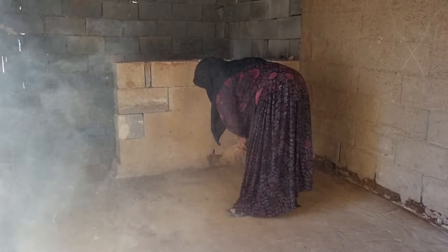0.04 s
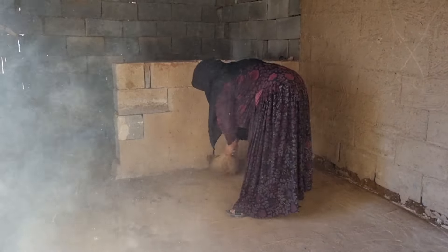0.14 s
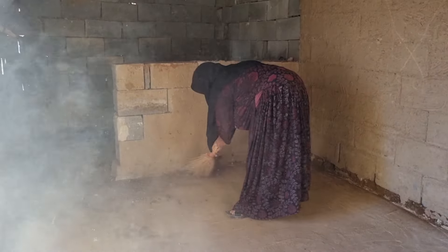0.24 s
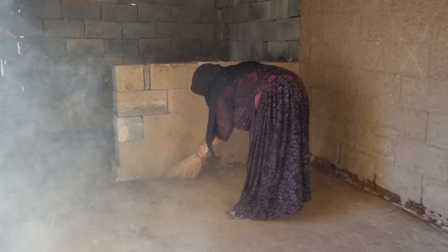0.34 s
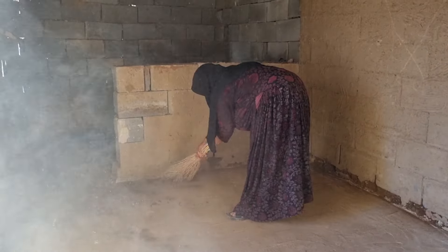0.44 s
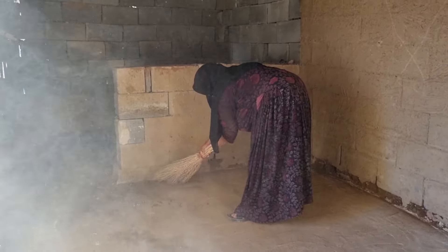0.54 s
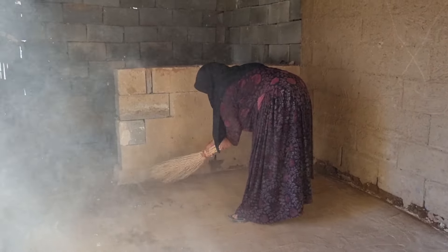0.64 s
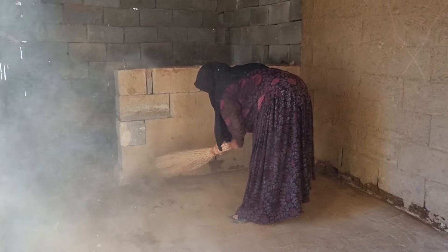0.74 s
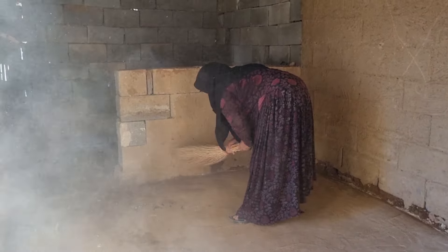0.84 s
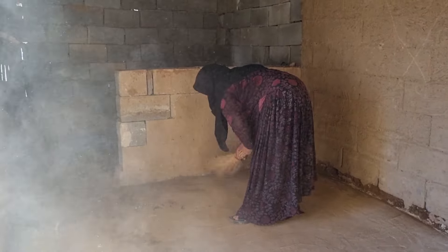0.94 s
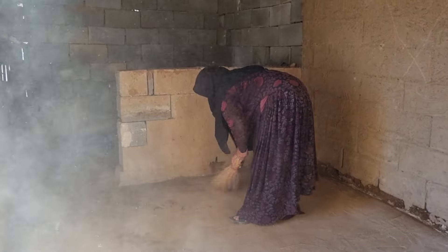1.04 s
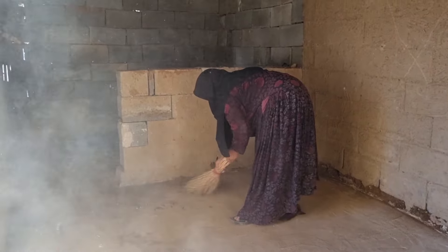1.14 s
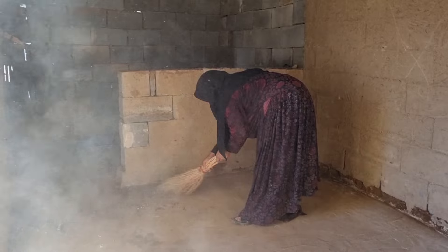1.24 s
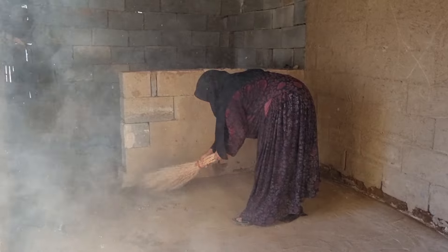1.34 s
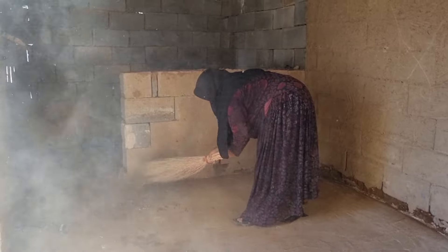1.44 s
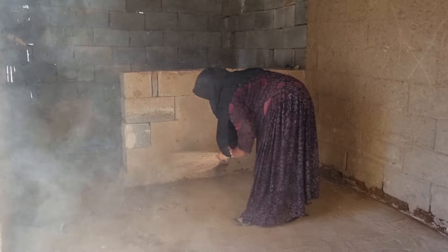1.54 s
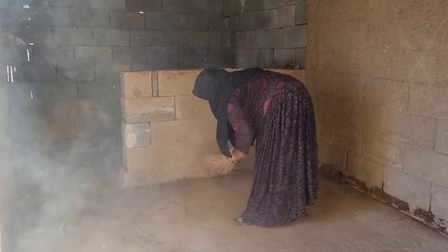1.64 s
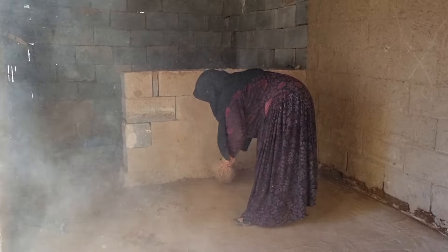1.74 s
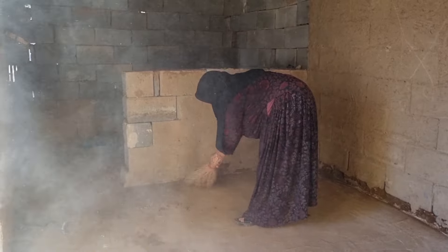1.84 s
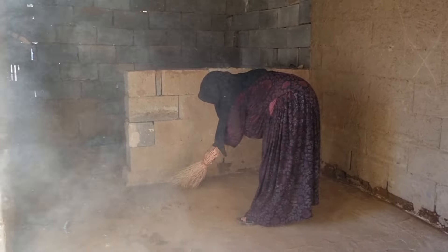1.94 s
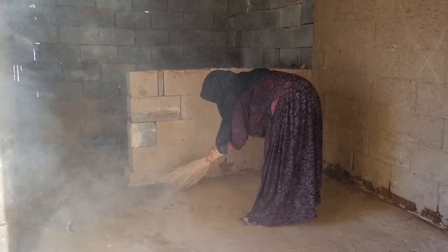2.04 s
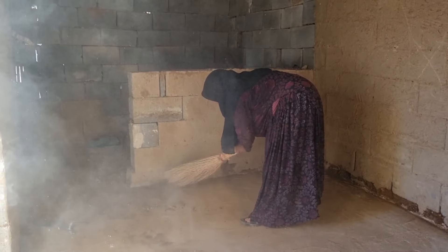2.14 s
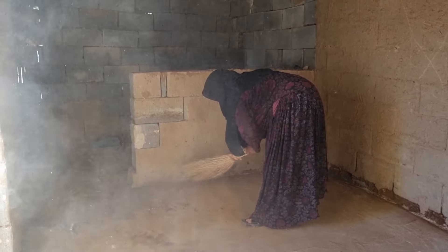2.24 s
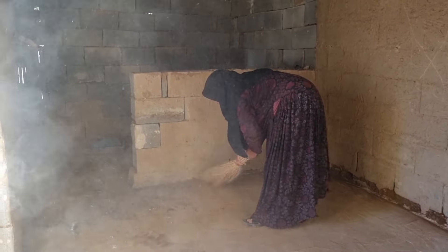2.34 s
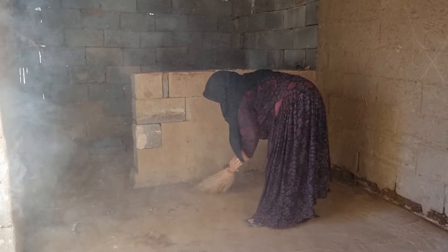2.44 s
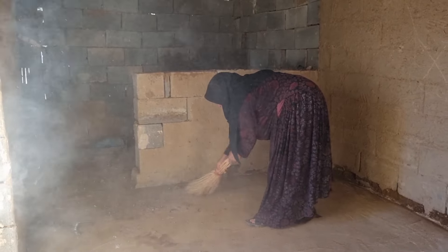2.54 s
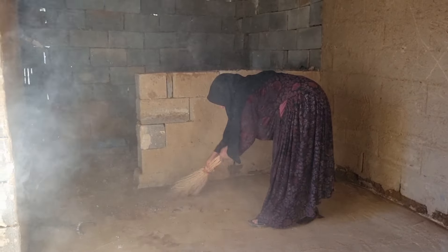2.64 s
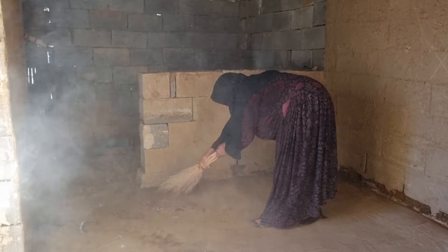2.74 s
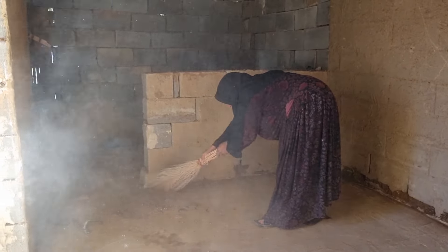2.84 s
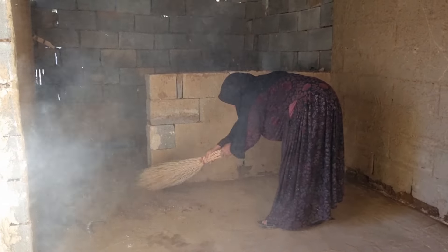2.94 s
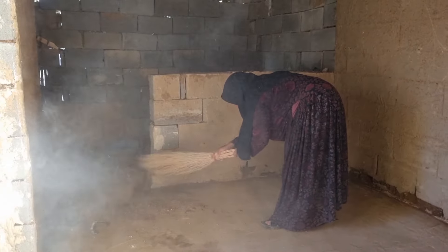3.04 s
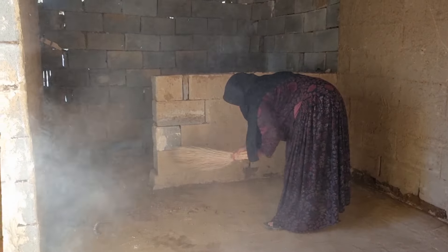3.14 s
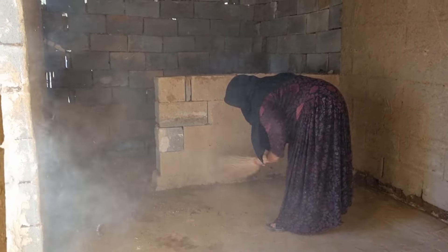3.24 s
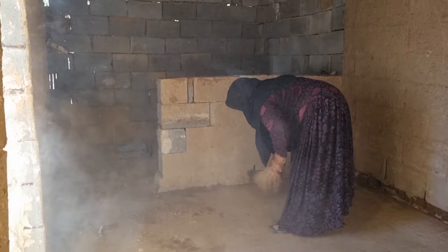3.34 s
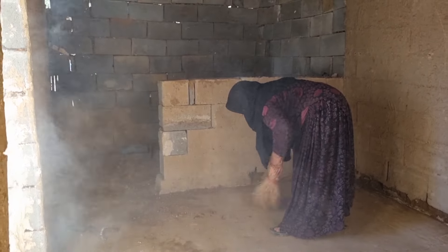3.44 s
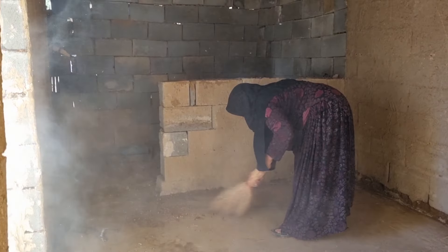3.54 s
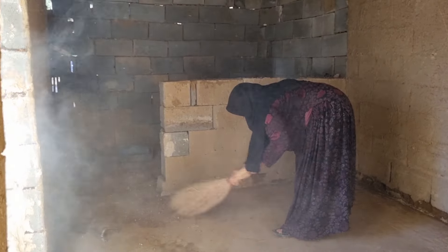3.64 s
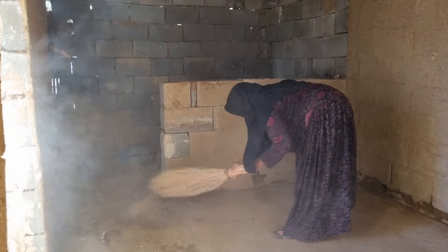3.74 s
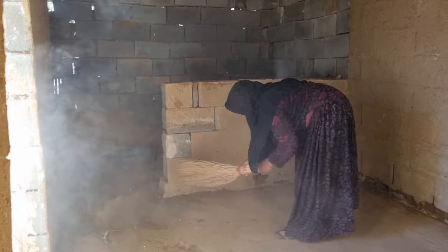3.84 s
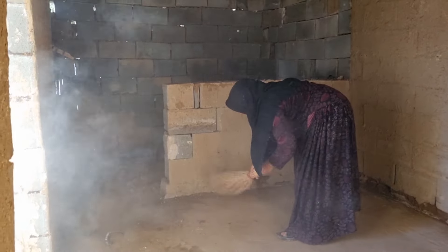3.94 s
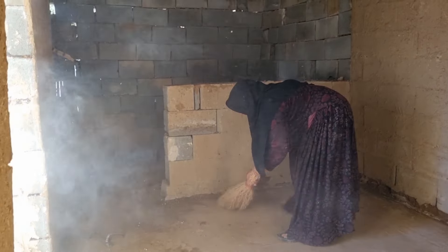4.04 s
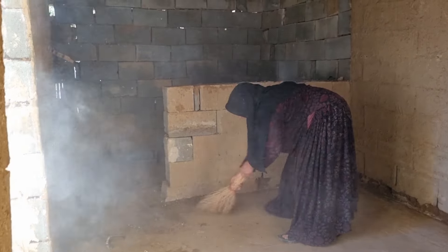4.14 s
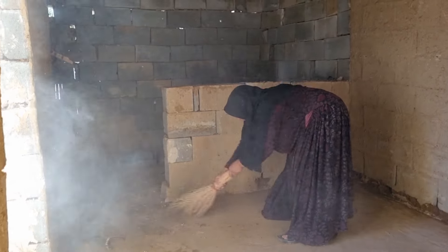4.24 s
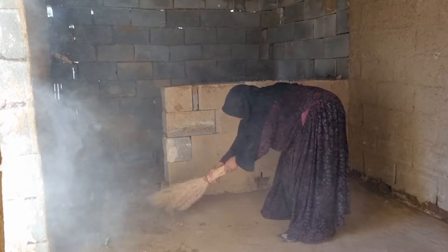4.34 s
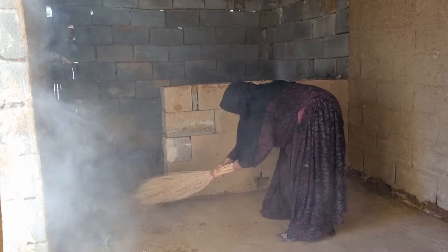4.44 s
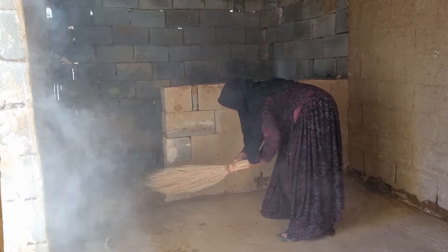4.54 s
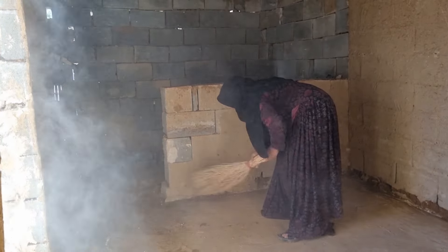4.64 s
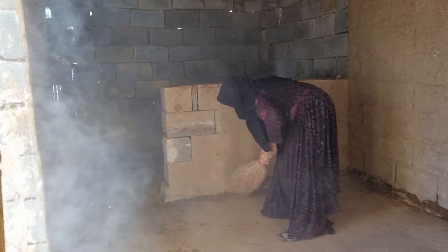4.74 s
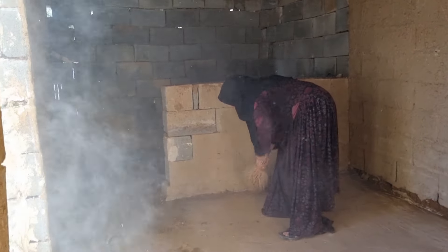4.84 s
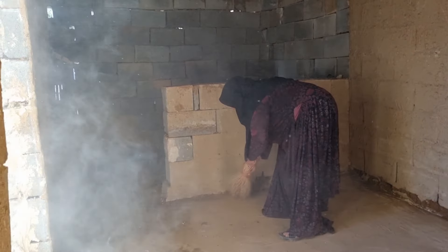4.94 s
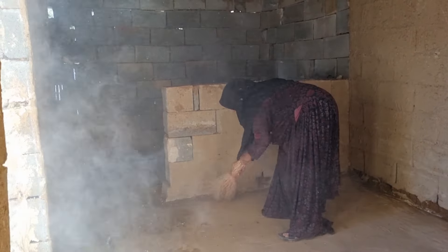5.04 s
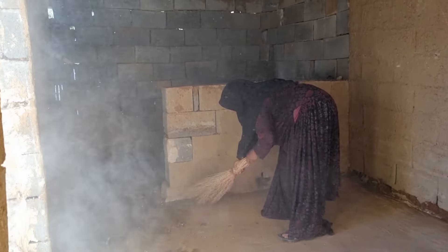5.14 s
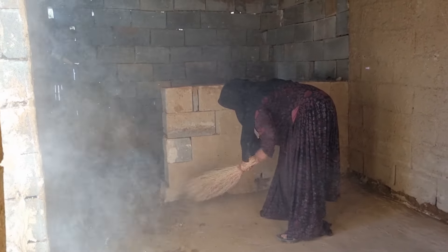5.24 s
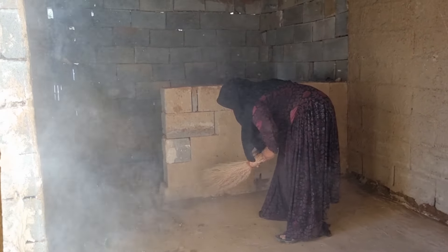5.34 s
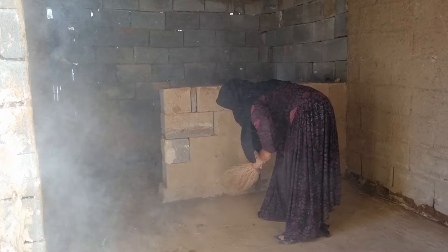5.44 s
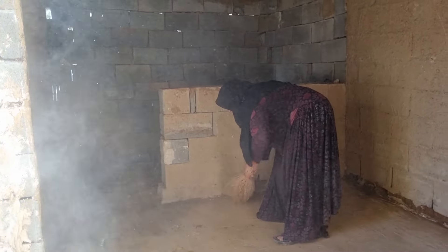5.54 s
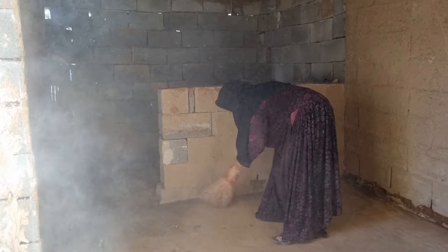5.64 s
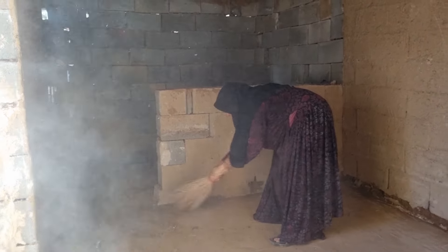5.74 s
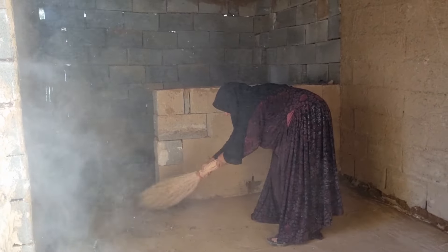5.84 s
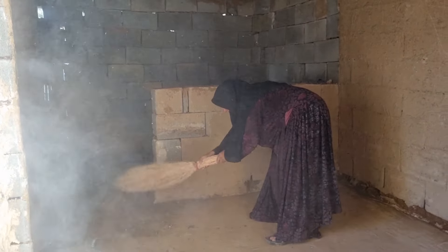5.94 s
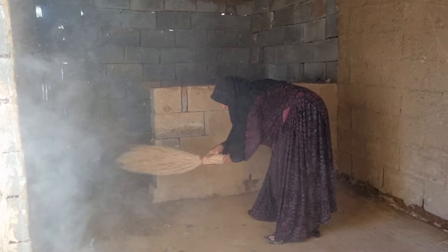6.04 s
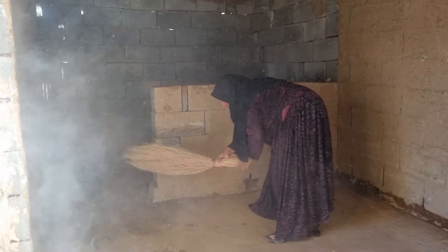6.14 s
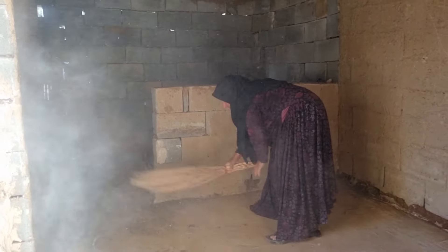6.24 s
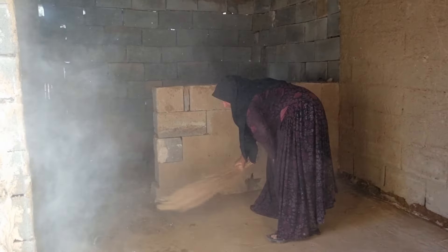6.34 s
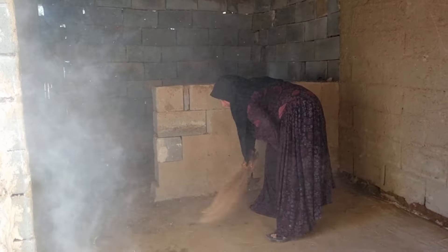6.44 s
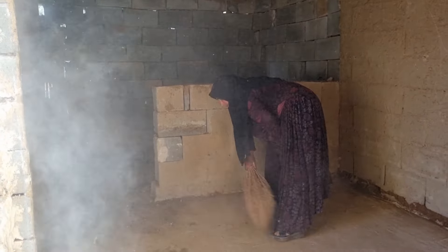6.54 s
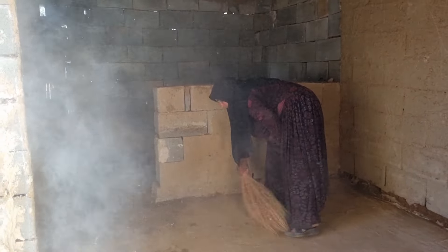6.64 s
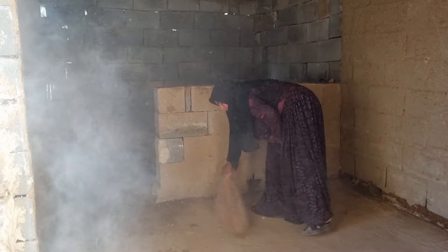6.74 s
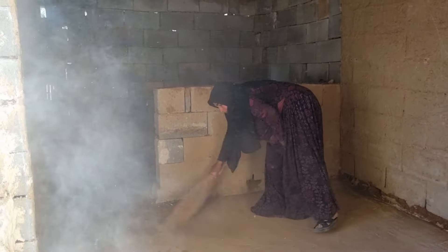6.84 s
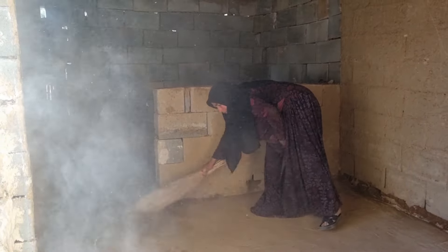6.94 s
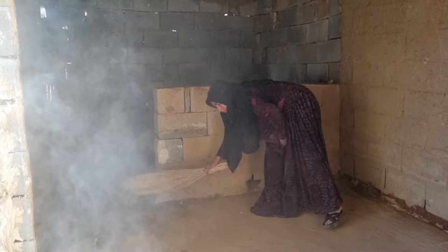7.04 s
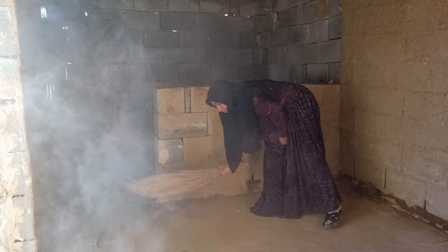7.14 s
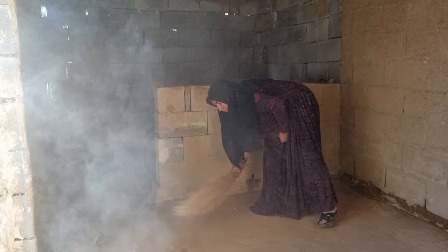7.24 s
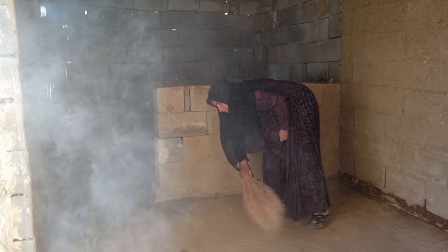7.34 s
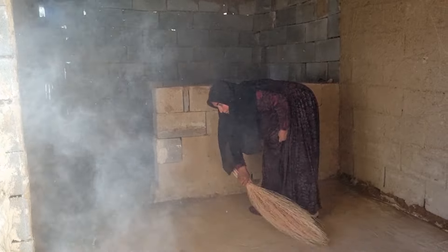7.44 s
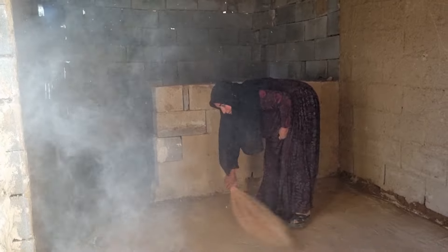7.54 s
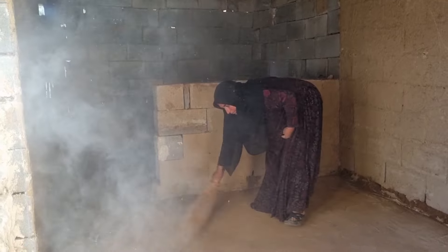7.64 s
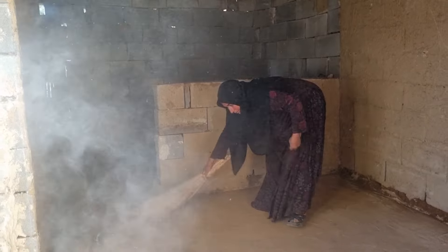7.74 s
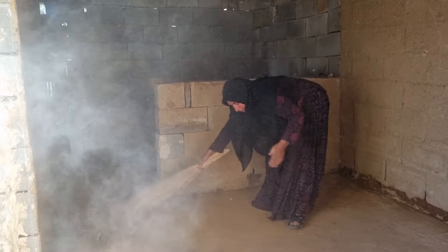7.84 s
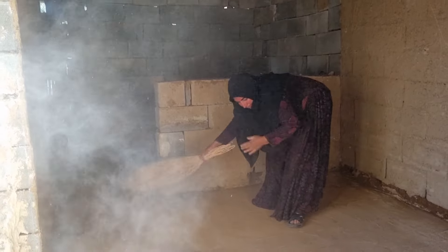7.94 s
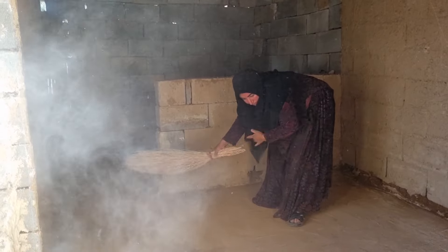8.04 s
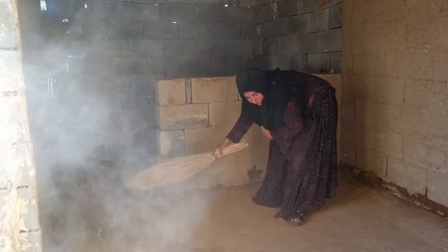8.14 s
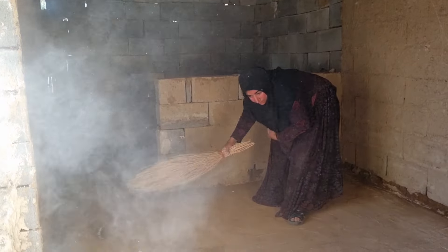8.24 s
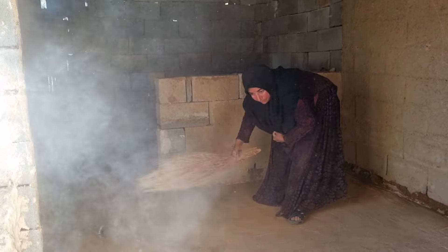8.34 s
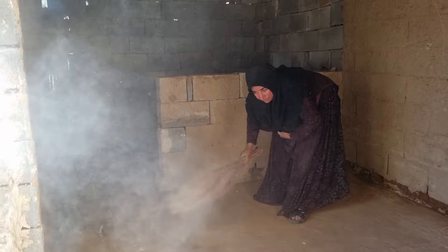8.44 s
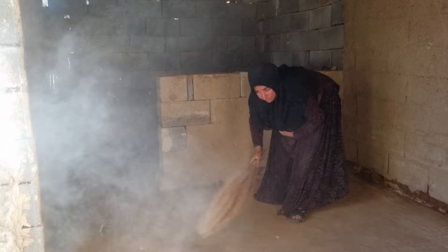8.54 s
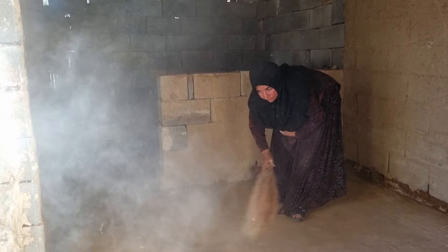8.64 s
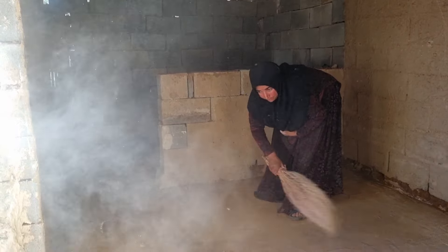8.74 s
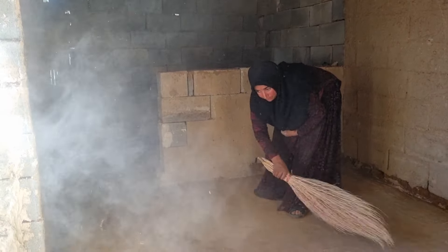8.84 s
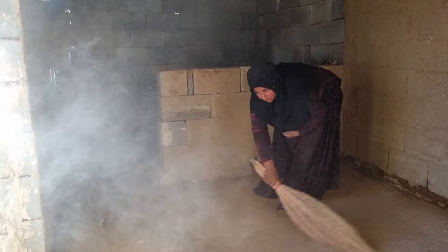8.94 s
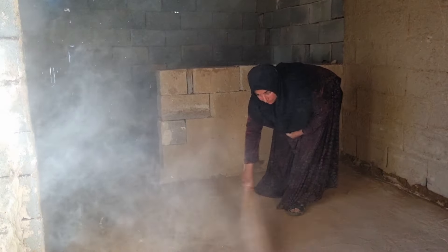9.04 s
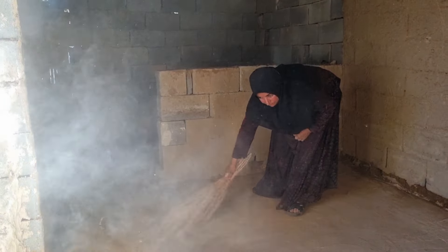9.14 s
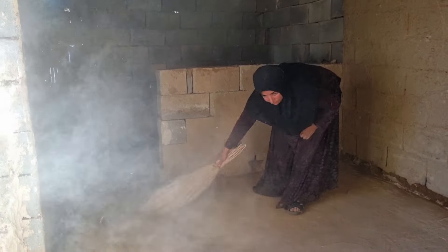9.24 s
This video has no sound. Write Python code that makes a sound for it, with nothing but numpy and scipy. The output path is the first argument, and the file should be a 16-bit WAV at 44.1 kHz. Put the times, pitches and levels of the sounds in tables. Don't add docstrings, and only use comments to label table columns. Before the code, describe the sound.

Dry swishes of a straw broom on dusty concrete, broken by snaps, gritty clicks and soft hollow thuds, over a very faint outdoor rumble.

```python
import sys
import numpy as np
from scipy import signal
from scipy.fft import rfft, irfft, next_fast_len
from scipy.io import wavfile

SR = 44100
rng = np.random.default_rng(int(sys.argv[2]) if len(sys.argv) > 2 else 0)


def dump_mix(stems):
    frames = np.atleast_2d(stems).T
    limited = np.clip(frames, -1, 1)
    pcm = np.round(limited * 32767).astype(np.int16)
    wavfile.write(sys.argv[1], SR, pcm)


def elevation(decibels):
    levels = np.asarray(decibels, float)
    return 10 ** (levels / 20)


N = 409235

# time in seconds, level in dB.
RUMBLE = [(0.0, -62.5), (1.14, -63.5), (1.29, -63.5), (1.89, -59.5), (2.35, -65), (3.07, -59.5),
          (3.64, -60), (4.29, -57), (4.91, -64.5), (5.81, -59), (6.23, -65), (6.93, -57), (7.21, -69),
          (7.65, -53), (7.91, -64.5), (9.28, -63.5)]
# frequency in Hz, level in dB per Hz.
AIR_COLOUR = [(13, -38), (22, -3), (43, -8), (76, -9), (97, -10.5), (177, -20.5), (280, -19), (520, -28),
              (947, -33.5), (1600, -42), (1830, -44.5), (2690, -32), (3260, -31.5), (7230, -23),
              (9780, -40), (15600, -27.5)]
# time in seconds, pitch in Hz, level in dB.
CROW = [
    (1.36, 985, -81),
    (1.45, 975, -80),
    (1.53, 955, -82),
    (1.6, 933, -76),
    (1.78, 922, -77),
    (1.95, 915, -81),
    (2.1, 907, -74),
    (2.28, 896, -75),
    (2.4, 870, -90),
]
# frequency in Hz, time to fall 60 dB in seconds.
ROOM_ECHO = [(100, 0.29), (500, 0.21), (2000, 0.17), (6000, 0.14), (14000, 0.16)]
# start in seconds, peak in dB, contact frequency in Hz.
THUDS = [(0.91, -46, 150), (1.144, -20.5, 110), (1.95, -45, 200), (3.189, -43, 150), (3.717, -38.5, 500),
         (3.735, -37, 300), (3.766, -20, 2600), (3.785, -27.5, 503), (3.797, -33.5, 607),
         (3.817, -43.5, 500), (4.025, -47.5, 400), (4.095, -30, 203), (4.12, -18.5, 90), (5.7, -39.5, 300),
         (6.735, -51, 353), (7.347, -49, 447), (7.705, -38, 300), (9.24, -37, 300)]
# frequency in Hz, level in dB, time to fall 60 dB in seconds.
LEDGE_TONES = [(97, -9.5, 0.1), (200, -17, 0.06), (253, -5.5, 0.09), (257, -16.5, 0.32), (291, -8, 0.1),
               (345, 4.5, 0.072), (340, -17, .32), (395, -9, 0.08), (572, -8, 0.06), (732, -19, 0.05),
               (1090, -9.5, 0.017), (1450, -11, 0.015), (1790, -17, .012)]
# start in seconds, peak in dB, ring in Hz, share of ring in dB.
SNAPS = [(0.1012, -30, 8000, -13), (0.9816, -25.5, 7200, -6), (1.4194, -42, 7030, -3),
         (1.6162, -41, 8220, -8), (1.7659, -26, 7300, -4), (2.3301, -38, 7450, 4), (3.454, -22, 7700, -3),
         (3.7128, -16, 5960, -9.5), (3.7185, -24, 7500, -1), (4.8726, -39, 7600, 3), (5.5, -40, 7720, -3),
         (5.9998, -29, 7660, 5.5), (6.3919, -53, 7330, -3), (6.57, -34, 7140, -7), (7.8594, -33, 7400, -4),
         (7.9124, -42, 7480, -6), (8.1294, -43, 7730, -3), (8.2094, -55, 5520, -3),
         (8.2836, -38, 7050, -3.5), (8.3694, -44, 7210, -3), (8.5028, -36, 7360, 0), (8.72, -49, 6620, -1),
         (8.832, -38.5, 7360, 1.5)]
# start in seconds, peak in dB, ring in Hz, share of ring in dB.
PEBBLES = [(0.9744, -42, 3970, -2), (1.5294, -44, 4940, -8), (1.6661, -42, 2140, -2),
           (3.1632, -39, 2780, 3), (3.3764, -35, 3240, -8), (3.892, -27, 6060, 1), (3.985, -34, 2440, -8),
           (4.0235, -28, 2410, -5), (4.29, -17.5, 7300, -5), (4.3695, -24.5, 2510, -9),
           (4.4994, -44, 2440, -3), (4.763, -34.5, 2380, -1), (4.832, -44, 4930, -4),
           (5.9754, -34, 5320, -1), (6.13, -35.5, 2600, -1), (6.1437, -36, 4300, -4),
           (7.089, -39, 3030, -10), (7.3188, -49, 2190, 0), (7.7043, -21, 2250, 0), (7.955, -38, 4660, 1),
           (8.449, -41.5, 4720, -6), (9.2397, -20, 1920, -6)]
# start in seconds, length in
# seconds, level in dB, ring in Hz, width of the ring in Hz.
SCUFFS = [(3.12, 0.3, -63, 3310, 350), (3.15, 0.32, -69, 2680, 290), (3.13, 0.14, -71, 4700, 530),
          (4.3, .2, -59, 2580, 810), (6.4, .25, -69, 4000, 1100), (1.1, .08, -71, 240, 140),
          (3.77, 0.046, -53, 650, 250), (5.76, .16, -67.5, 270, 220), (2.8, 0.121, -70, 395, 40),
          (2.5, .16, -70, 256, 86), (2.52, .14, -67, 386, 50), (3.0, .45, -70.5, 233, 180),
          (3.5, .18, -61.5, 210, 140), (6.0, .6, -76, 230, 136), (7.72, .12, -68.5, 185, 100),
          (7.95, .06, -69, 770, 700), (7.985, .07, -63, 1070, 360), (7.92, .06, -70, 2370, 400),
          (9, .07, -61.5, 4800, 1800), (8.42, 0.13, -67.5, 4600, 1400), (4.32, .06, -56, 2350, 260),
          (4.49, .06, -65, 2450, 350), (6.44, .14, -69, 2500, 500), (4.45, .3, -73, 220, 210),
          (1.62, .08, -66, 3000, 1700), (4.0, .06, -60, 2400, 500), (6.71, .23, -53.5, 274, 300),
          (7.1, 0.18, -69.5, 200, 140), (1.12, .16, -63.5, 295, 220), (4.1, .35, -60, 290, 320),
          (5.74, .12, -61, 1250, 1100), (9.12, .15, -63, 780, 400), (.12, .2, -57, 2240, 860),
          (4.3, .22, -61, 440, 660), (5.64, .16, -57.5, 600, 500), (7.28, .14, -59, 570, 610),
          (7.95, 0.28, -65.5, 5900, 1400), (2.3, .6, -72.5, 360, 15), (8.15, .5, -70, 4500, 3100)]
# start in seconds, dying time in seconds, level in dB,
# ring in Hz, width of the ring in Hz.
SCRAPES = [(3.718, .04, -46, 2900, 600), (3.865, .15, -56, 6100, 200), (3.893, .05, -50, 2420, 500),
           (4.291, 0.071, -47, 2160, 500), (4.296, 0.044, -46, 5200, 700), (4.293, .04, -50, 7300, 900),
           (4.374, .03, -54, 4500, 5000), (4.756, .05, -54, 7000, 2200), (4.83, .03, -63, 6500, 2500),
           (6.0, .06, -50, 7720, 300), (6.02, .04, -64, 5100, 300), (6.14, .1, -61, 4050, 500),
           (6.13, 0.13, -67, 1600, 300), (4.372, .04, -54, 1200, 500), (4.395, .06, -51, 3220, 500),
           (4.497, .05, -60, 2400, 500), (4.757, 0.037, -59, 2380, 400), (6.13, .03, -58, 5000, 3000),
           (6.142, 0.05, -55, 2400, 600), (6.155, 0.063, -54, 5800, 900), (6.158, 0.035, -59, 7800, 600),
           (7.7, 0.049, -49, 2300, 700), (8.0, .3, -69, 454, 300), (8.832, .04, -68, 4200, 1200),
           (9.238, .05, -49, 1900, 500), (3.79, .03, -56, 1750, 500), (3.79, .03, -58, 700, 300)]
# frequency in Hz, level in dB per Hz.
STRAW_COLOUR = [(150, -2.5), (350, -12.5), (700, -15), (1400, -9.5), (2200, -6.5), (3500, -8.5),
                (5500, -6.5), (6600, -4), (7600, 2), (8300, -4), (8900, -8.5), (10600, -7.5), (13000, -3),
                (15700, 0)]
# time in seconds, level in dB, weight on the floor in dB.
SHUFFLE = [(0, -72, -7.5), (.5, -56, 4.5), (.78, -61, -0.5), (.95, -63, 1), (1.5, -62, 2.5),
           (1.75, -61, -4), (2.05, -60, 2), (2.3, -58, 2.5), (3.1, -58, 2), (4.0, -50, 3.5),
           (4.5, -56.5, 2.5), (4.85, -73.5, -2), (5.53, -56.5, 1.5), (5.95, -59, -3), (6.38, -62.5, 0.5),
           (7.2, -63, 5), (7.9, -59.5, -1.5), (8.4, -67.5, -4.5), (8.8, -73.5, 0)]
# fastest moment in seconds, rise in seconds, fall in seconds,
# hiss in dB, weight on the floor in dB.
PUSHES = [(.175, 0.091, 0.19, -31.5, 0), (1.12, .13, 0.2, -31, 1), (1.81, 0.07, 0.22, -31.5, 0),
          (2.52, 0.17, 0.16, -31, 0.5), (3.54, 0.12, 0.13, -25, -1), (4.16, 0.13, 0.1, -30, 1.5),
          (4.98, 0.13, 0.35, -39, 4), (5.66, 0.16, 0.2, -35, 3.5), (6.76, 0.13, .19, -29, 5),
          (7.58, 0.13, 0.21, -26, -0.5), (9.03, .13, 0.3, -26, -4)]
FLICKS = [(.28, 0.11, 0.078, -41, 6.5), (.53, 0.23, 0.16, -46, 2.5), (.7, 0.31, 0.077, -37.5, -1.5),
          (1.37, 0.28, 0.12, -40, -2.5), (2.12, 0.29, 0.12, -39, -4), (2.7, 0.096, 0.13, -46.5, 5.5),
          (2.89, 0.19, 0.12, -38, -2), (3.67, 0.11, .02, -38, 2), (4.39, 0.37, .17, -42, 0),
          (4.71, 0.054, 0.06, -54.5, 2), (5.22, 0.33, 0.071, -38, -3), (5.84, 0.13, 0.077, -32.5, -4),
          (6.06, 0.059, 0.094, -56, 7), (6.96, 0.12, 0.1, -49.5, -14), (7.86, 0.11, 0.11, -52, -3),
          (8.13, .1, 0.044, -60, 7), (8.3, .1, .1, -63, -1), (8.75, 0.12, .1, -66, -1),
          (9.2, 0.24, 0.1, -35, 4.5)]
TOUCHES = [(.985, 0.013, .15, -42.5, -3), (1.65, 0.054, 0.16, -62, 12), (2.35, 0.046, 0.091, -41, -4.5),
           (3.2, 0.21, 0.23, -61.5, 8), (3.38, .01, .1, -46.5, -3), (3.714, .002, 0.03, -30, 2),
           (3.8, 0.071, 0.085, -45, 8), (3.895, 0.008, 0.073, -44.5, 6.5), (4.025, 0.03, 0.069, -44.5, 7),
           (4.293, 0.004, 0.16, -38, 6), (4.6, .1, 0.093, -51, -2.5), (4.765, .015, 0.025, -46.5, -5),
           (5.45, 0.071, 0.11, -40.5, -1), (6.0, 0.011, 0.091, -47, 1.5), (6.145, 0.02, 0.11, -49.5, 2),
           (6.3, .05, .08, -63, 5), (6.55, 0.17, 0.12, -58, 8.5), (6.58, 0.024, 0.12, -43, 1),
           (7.1, 0.08, 0.087, -59.5, 4), (7.36, 0.19, 0.16, -63, 15), (7.695, 0.11, 0.035, -37, 9),
           (7.965, .02, 0.27, -55, 5.5), (8.95, 0.034, .1, -38.5, 1.5), (5.88, 0.071, 0.033, -47, -1),
           (8.51, 0.13, .05, -56, -8), (9.245, 0.041, 0.066, -38.5, 11)]
# roundness of rise, roundness of fall, grit share in dB,
# grit lag in seconds, drag share in dB, drag lag in seconds, drag in dB per dB of weight.
PUSH_KIND = (1.83, 1.5, -8, 0.0271, -21.5, 0.02, 1.5)
FLICK_KIND = (1.65, 1.45, -9.5, 0, -21, -0.02, 1.5)
TOUCH_KIND = (2.5, 1, -6.5, 0.004, -19, 0.05, 1.3364)
# time in seconds, left over right in dB.
PLACE = [
    (0, -2.5),
    (2, -2.5),
    (3.6, -3),
    (4.5, -4),
    (6.5, -4.5),
    (7.7, -4),
    (8.2, -3.5),
    (8.7, -5.5),
    (9.28, -4.4),
]
# frequency in Hz, left over right in dB.
LEFT_OVER_RIGHT = [(60, 2), (300, .5), (800, -1), (1500, -3.3), (6000, -3.6), (13000, -4.5)]

ECHO_EDGES = 40 * 2 ** np.arange(10)
STEP, HOP = 512, 256
SWING_DB = 20


def rms_one(x):
    return x / np.sqrt(np.mean(x ** 2) + 1e-20)


def in_time(rows):
    s, *columns = np.transpose(rows)
    return [np.interp(np.arange(N) / SR, s, column) for column in columns]


def at_hz(points, hz):
    table_hz, values = np.array(points).T
    return np.interp(np.log(hz), np.log(table_hz), values)


def coloured(x, points):
    size = next_fast_len(N, real=True)
    hz = np.maximum(np.arange(size // 2 + 1) * SR / size, 1)
    return irfft(rfft(x, size) * elevation(at_hz(points, hz)), size)[..., :N]


def band(x, low_hz, high_hz):
    edges = [low_hz, min(high_hz, .45 * SR)]
    return signal.sosfilt(signal.butter(2, edges, "band", fs=SR, output="sos"), x)


def drift(rate):
    r = np.exp(-80 * np.pi * rate / SR)
    noise = rng.standard_normal(N // 40 + 2002)
    slow = signal.lfilter([1], [1, -2 * r, r * r], noise)[2000:]
    return np.interp(np.arange(N) / 40, np.arange(len(slow)), rms_one(slow))


def ring(clicks, hz, t60):
    r = elevation(-60 / (t60 * SR))
    w = 2 * np.pi * hz / SR
    return signal.lfilter([0, np.sin(w)], [1, -2 * r * np.cos(w), r * r], clicks + 1e-18)


def outdoors(hiss_db=-68):
    air = coloured(rng.standard_normal((2, N)), AIR_COLOUR)
    low = signal.sosfilt(signal.butter(4, 135, fs=SR, output="sos"), air)
    rumble = rms_one(low) * elevation(in_time(RUMBLE)[0] + 6.5 + drift(3.6))
    return rumble + elevation(hiss_db) * rms_one(band(air, 144, 19000))


def cockerel():
    pitch_hz, db = in_time(CROW)
    phase = 2 * np.pi * np.cumsum(pitch_hz * (1 + .004 * drift(30))) / SR
    start, end = CROW[0][0], CROW[-1][0]
    sounding = np.interp(np.arange(N) / SR, [start - .05, start, end, end + .05], [0, 1, 1, 0])
    return sounding * elevation(db + 5.0 + 2.6 * drift(13)) * np.sin(phase)


def thuds():
    push = np.zeros(N + SR)
    for s, db, contact_hz in THUDS:
        contact = np.hanning(round(SR / contact_hz) + 2)
        at = round(s * SR)
        push[at:at + len(contact)] += elevation(db) * contact / contact.sum()
    return -sum(elevation(db - 2.0) * ring(push[:N], hz, t60) for hz, db, t60 in LEDGE_TONES)


def ticks(snap_db=8.0):
    out = np.zeros(N + SR)
    age = np.arange(SR // 5) / SR
    pieces = [(*row, 0.011, 5.5) for row in SNAPS] + [(*row, 0.012, -5) for row in PEBBLES]
    for s, db, hz, ring_db, rattle_s, top_db in pieces:
        shape = elevation(snap_db) * np.exp(-age / 0.0015) + np.exp(-age / max(rattle_s, .002))
        rattle = rng.standard_normal(len(age)) * shape
        rattle[0] = elevation(snap_db + 10.5)
        top = band(rattle, 11000, 21000)
        crackle = band(rattle, 2120, 7300) - elevation(top_db - 4.0) * top
        body = band(rattle, hz / 1.06, hz * 1.06)
        sound = crackle / crackle.max() + elevation(ring_db - 2.0) * body / body.max()
        at = round(s * SR)
        out[at:at + len(age)] += elevation(db - 5) * sound
    return out[:N]


def scuffs(rough_db=1.5):
    out = np.zeros(N + SR)
    rough = elevation(rough_db * drift(28))
    for rows, bites in ((SCUFFS, False), (SCRAPES, True)):
        for s, length, db, hz, width_hz in rows:
            at = round(s * SR)
            size = round(length * SR * (2 if bites else 1))
            noise = rng.standard_normal(SR)
            rub = band(noise, max(hz - width_hz / 2, 20), hz + width_hz / 2)[-size:]
            if bites:
                shape = elevation(-2 * SWING_DB * np.arange(size) / size)
            else:
                shape = np.sqrt(np.hanning(size))
            out[at:at + size] += elevation(db) * rms_one(rub) * shape
    return out[:N] * rough


def swings(rows, round_in, round_out, share_db=0, lag_s=0, per_weight=0):
    s, rise, fall, db, weight_db = np.transpose(rows)[:, :, None]
    grid = np.arange(0, N + STEP, STEP // 8) / SR
    age = grid - s - lag_s
    lift_share = 0.91 if per_weight else 1
    before = np.abs(age / rise) ** round_in
    after = np.abs(age / fall / lift_share) ** round_out
    away = np.where(age < 0, before, after)
    power = elevation(db + share_db + per_weight * weight_db - SWING_DB * away) ** 2
    return np.interp(np.arange(N) / SR, grid, power.sum(axis=0))


def contact():
    db, weight_db = in_time(SHUFFLE)
    hiss, grit, drag = elevation([db - 4 - weight_db, db, db - 11 + weight_db]) ** 2
    for rows, kind in ((PUSHES, PUSH_KIND), (FLICKS, FLICK_KIND), (TOUCHES, TOUCH_KIND)):
        round_in, round_out, grit_db, grit_lag, drag_db, drag_lag, drag_weight = kind
        hiss = hiss + swings(rows, round_in, round_out)
        grit = grit + swings(rows, round_in, round_out, grit_db, grit_lag, 0.94)
        drag = drag + swings(rows, round_in, round_out, drag_db, drag_lag, drag_weight)
    return np.sqrt([hiss, grit, drag])


def straw(slips_per_s=5000, spread_db=3.0, patchy_db=0.56):
    hiss_gain, grit_gain, drag_gain = contact()
    sizes = elevation(spread_db * np.minimum(rng.exponential(1, N), 3)) * rng.choice([-1, 1], N)
    slips = sizes * (rng.random(N) < slips_per_s / SR)
    tips = coloured(rms_one(slips) + 0.33 * rng.standard_normal(N), STRAW_COLOUR)
    clumps_db = 1.16 * drift(120)
    hiss = rms_one(band(tips, 6250, 18460)) * hiss_gain * elevation(patchy_db * drift(28))
    gritty = band(band(tips, 1790, 15700), 1580, 5220)
    grit = rms_one(gritty) * grit_gain * elevation(patchy_db * drift(16))
    dull = band(band(tips, 260, 5800), 303, 1610)
    drag = rms_one(dull) * drag_gain * elevation(3.0 + .5 * patchy_db * drift(11))
    slab = band(band(tips, 160, 420), 160, 420)
    boom = rms_one(slab) * drag_gain * elevation(-10.0 + patchy_db * drift(9))
    return elevation(clumps_db - 8.0) * (hiss - grit + drag - boom)


def walls(x, count):
    age, size = np.arange(14 * STEP) / SR, 16 * STEP
    shape = (count, 2, len(age))
    tails = 0
    for low_hz, high_hz in zip(ECHO_EDGES, ECHO_EDGES[1:]):
        dying = elevation(-60 * age / at_hz(ROOM_ECHO, low_hz))
        tails = tails + band(rng.standard_normal(shape), low_hz, high_hz) * dying
    spots = rfft(tails / np.sqrt(np.mean(np.sum(tails ** 2, axis=2))), size)
    fade = np.sin(np.pi * (np.arange(2 * HOP) + .5) / (2 * HOP))
    padded = np.pad(x, (HOP, STEP + 2 * HOP))
    wet = np.zeros((2, N + STEP + 2 * size))
    for i in range(0, N + HOP, STEP):
        spectrum = 0
        for j in range(0, STEP, HOP):
            start = i + j
            moment = np.pad(padded[start:start + 2 * HOP] * fade, (j, 0))
            spectrum = spectrum + rfft(moment, size) * spots[start // HOP % count]
        wet[:, i:i + size] += irfft(spectrum, size)
    return wet[:, HOP:HOP + N]


def scene():
    outside = cockerel() + outdoors()
    blows = band(band(thuds(), 62, 9000), 55, 12000)
    debris, rubs, sweep = ticks(), scuffs(), straw()
    near = sweep + elevation(5.0) * rubs + debris
    late = np.pad(near, (round(.00046 * SR), 0))[:N]
    into_room = elevation(8.0) * sweep + elevation(6.0) * rubs + elevation(1.5) * debris + elevation(-9.0) * blows
    echoes = walls(into_room, count=24)
    place_db = in_time(PLACE)[0]
    lean = elevation(.6 * (place_db - place_db.mean()) * [[.5], [-.5]])
    return lean * (np.array([near, late]) + echoes) + blows + outside


def low_pass(x):
    return signal.sosfilt(signal.butter(12, 16990, fs=SR, output="sos"), x)


def record(dry):
    mid, side = (dry[0] + dry[1]) / 2, (dry[0] - dry[1]) / 2
    mono_below_hz = 197
    side_colour = [(30, -7), (70, -12), (140, -19), (mono_below_hz, -14), (mono_below_hz * 5.7, 0)]
    side = coloured(side, side_colour)
    left_colour = [(hz, db / 2) for hz, db in LEFT_OVER_RIGHT]
    right_colour = [(hz, -db / 2) for hz, db in LEFT_OVER_RIGHT]
    ports = np.array([coloured(mid + side, left_colour), coloured(mid - side, right_colour)])
    ports = signal.sosfilt(signal.butter(4, 58, "high", fs=SR, output="sos"), ports)
    ports = signal.sosfilt(signal.ellip(12, .5, 80, 15740, fs=SR, output="sos"), ports)
    return low_pass(ports)


dry = scene()
out = record(dry)
dump_mix(out)
```